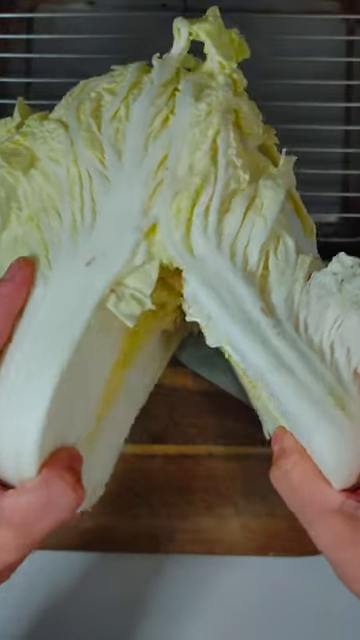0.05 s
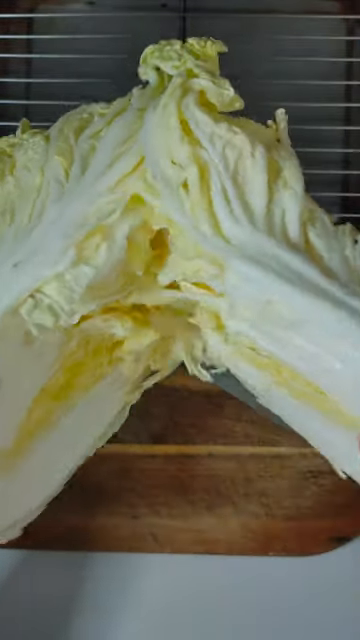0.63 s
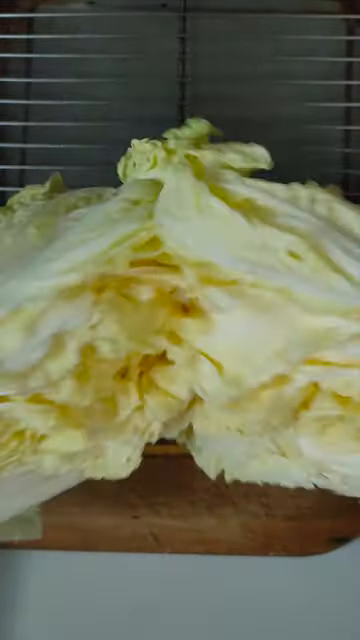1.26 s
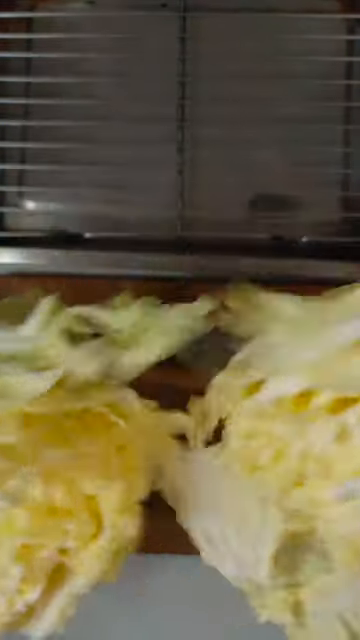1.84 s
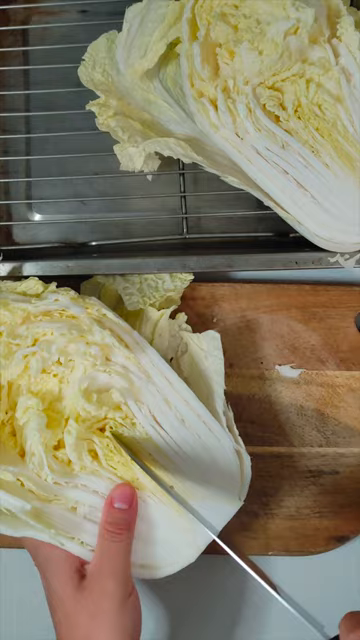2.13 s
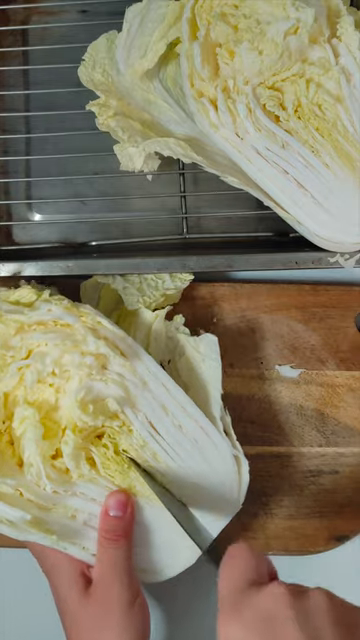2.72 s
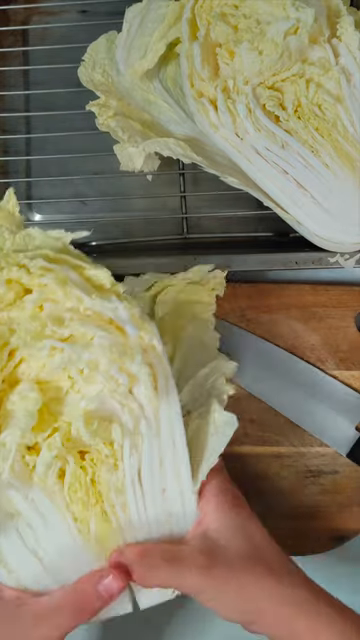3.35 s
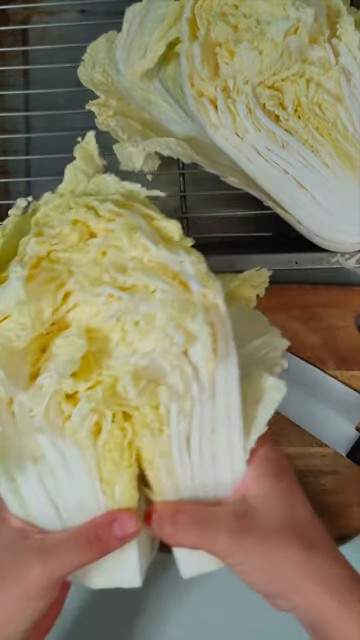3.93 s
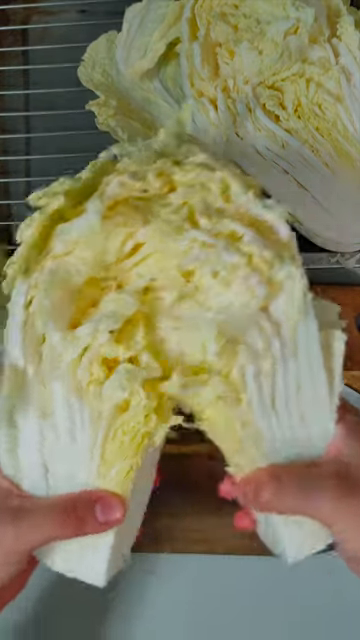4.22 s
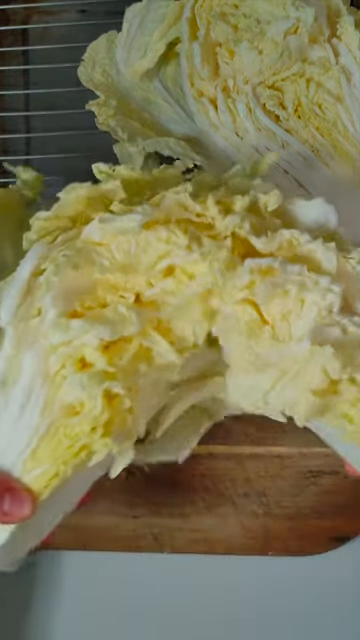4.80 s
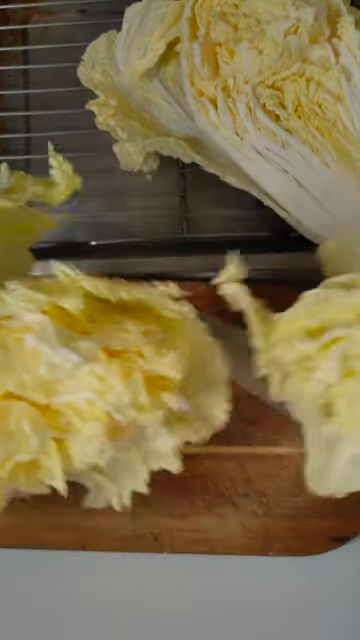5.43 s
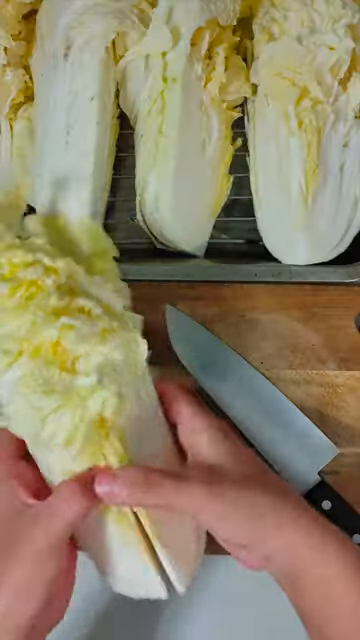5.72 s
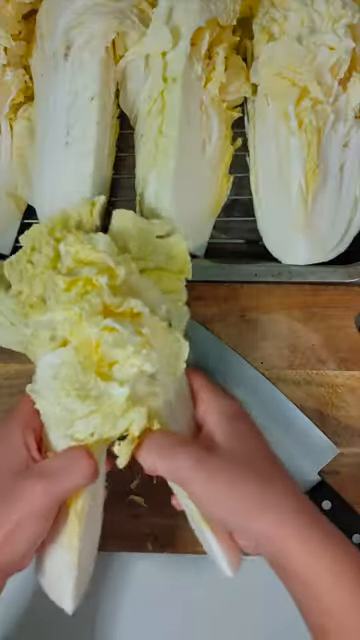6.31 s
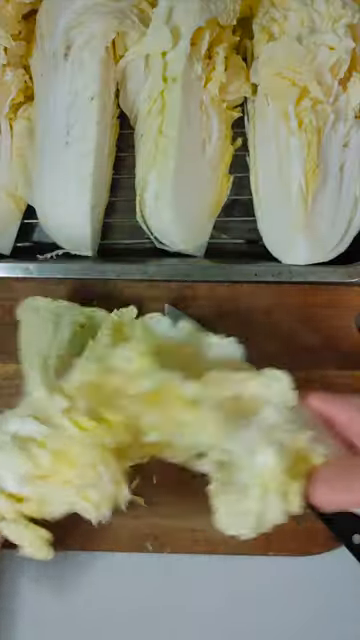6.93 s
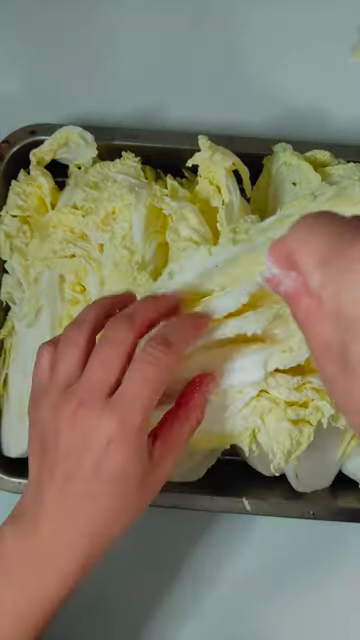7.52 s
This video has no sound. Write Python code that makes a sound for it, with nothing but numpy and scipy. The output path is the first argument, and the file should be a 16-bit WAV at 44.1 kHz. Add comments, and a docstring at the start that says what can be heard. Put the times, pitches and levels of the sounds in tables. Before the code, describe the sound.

Close, crunchy tearing of cabbage three times, with squeaky knife cuts and dull board thuds after the first, over a faint appliance hum.

```python
"""Small kitchen, a phone's two microphones close to a wooden board; an appliance hums throughout.
Hands rip a head of napa cabbage apart: turgid cells burst in dense runs, thick stalks pop hollowly
and whole ribs snap. From 2 s a knife crunches into a stem in three pushes, squeaks and thuds on the
board. Thumbs prise the cut stem open, a second head is ripped at 4 s and a third at 6 s.
Last, leaves are laid softly in a tray."""
import sys
import numpy as np
from scipy import signal
from scipy.fft import rfft, irfft, next_fast_len
from scipy.io import wavfile
from scipy.ndimage import uniform_filter1d, map_coordinates

SR = 44100
rng = np.random.default_rng(int(sys.argv[2]) if len(sys.argv) > 2 else 0)


def unload_wav(signal):
    """Save mono or channel-first audio to the path in sys.argv[1] as 16-bit WAV at rate SR, clipped to [-1, 1]."""
    wavfile.write(
        sys.argv[1],
        SR,
        np.round(np.clip(np.atleast_2d(signal).T, -1, 1) * 32767).astype(np.int16),
    )


N = 337806

# pitch limits of the four tissues (thick rib, thin rib, leaf blade, juice fizz): f/Hz
TISSUE_EDGES = [400, 850, 3300, 7400, 15000]
# single ribs giving way: t/s, level/dB, f/Hz, t60 of the split/s
RIB_SNAPS = [(0.065, -35.5, 1080, .06), (0.291, -32.5, 850, 0.082), (0.478, -27, 830, 0.043),
             (0.636, -41, 910, 0.11), (0.741, -31.5, 1190, 0.098), (0.923, -35.5, 1190, 0.061),
             (1.234, -32, 1100, 0.14), (1.419, -45, 2500, .08), (2.145, -43, 2660, 0.05),
             (2.216, -43, 4220, 0.043), (2.264, -39, 4800, .06), (2.507, -47, 1690, 0.036),
             (2.643, -40, 1290, 0.094), (3.032, -35, 1940, 0.04), (3.084, -35, 910, 0.072),
             (3.278, -26, 2680, 0.12), (4.113, -38.5, 4700, 0.055), (4.152, -37, 1020, 0.03),
             (4.252, -26, 1140, 0.041), (4.297, -27.5, 2050, 0.098), (4.395, -27.5, 1200, 0.049),
             (4.48, -33, 2100, .06), (4.582, -29, 1260, 0.059), (4.711, -31, 1050, 0.04),
             (4.745, -49, 1550, 0.058), (4.831, -30, 1820, 0.057), (4.98, -43, 1690, .05),
             (5.019, -28.5, 3240, .08), (5.073, -30, 4500, .04), (5.094, -29.5, 2800, 0.04),
             (5.121, -35, 1800, 0.051), (5.304, -39.5, 3000, 0.061), (5.353, -33, 4130, .1),
             (5.838, -50, 5370, 0.038), (5.947, -42, 1370, 0.053), (5.998, -42, 1440, 0.061),
             (6.055, -34.5, 1980, 0.11), (6.244, -29.5, 1860, 0.04), (6.364, -32.5, 1300, 0.068),
             (6.488, -36.5, 1850, 0.049), (6.576, -32, 2080, 0.038), (6.603, -35, 2260, .02),
             (6.747, -33, 1850, .03), (6.796, -35, 2200, 0.024)]
# thick, juicy stalks popping open under the hands or the blade: t/s, level/dB, f/Hz
STALK_POPS = [(0.064, -29, 520), (0.071, -28.5, 450), (0.296, -28, 900), (0.366, -25, 820),
              (0.381, -31, 640), (0.421, -31.5, 930), (0.479, -28, 568), (0.518, -28, 820),
              (0.552, -31.5, 980), (0.576, -28.5, 970), (0.637, -32, 890), (0.754, -31, 680),
              (0.844, -27.5, 640), (0.871, -25, 810), (0.972, -32, 545), (1.039, -33, 630),
              (1.118, -24.5, 690), (1.134, -30, 740), (1.198, -27.5, 870), (1.233, -26, 560),
              (1.249, -29, 690), (1.34, -30, 810), (2.366, -33, 1030), (2.397, -34, 1150),
              (2.714, -28.5, 1730), (3.083, -26, 810), (3.089, -27, 3050), (3.245, -25, 980),
              (3.258, -26, 940), (3.278, -24.5, 2650), (3.295, -26, 1030), (4.258, -28, 1070),
              (4.311, -24.5, 990), (4.585, -29.5, 1330), (4.699, -32, 990), (4.803, -31, 1030),
              (5.027, -30.5, 3100), (6.014, -34.5, 1980), (6.083, -32, 3010), (6.335, -34, 2020),
              (6.363, -27.5, 1480), (6.511, -27.5, 1980), (6.641, -27.5, 3050), (6.797, -31, 3050)]
# spectrum of one crack: f/Hz, level/dB
CRACK_COLOUR = [(60, -44), (200, -34), (600, 9.5), (1500, 14), (3000, 4), (6700, 3.5), (7700, -10.5),
                (10000, -1.5), (15500, -40)]


def ripping_hands():
    """Three heads torn apart close to the phone; in the last two, single fibres part as well."""
    # how hard the hands pull on each head: t/s, level/dB
    first_pull = [(0.0, -36.5), (0.08, -43), (0.17, -45), (0.28, -41), (0.3, -33.5), (0.37, -39),
                  (0.9, -37), (0.92, -33.5), (1.06, -41), (1.13, -37.5), (1.15, -43.5), (1.222, -34),
                  (1.238, -34.5), (1.3, -32), (1.36, -34), (1.41, -40), (1.44, -35), (1.51, -39),
                  (1.55, -43.5), (1.8, -34.5), (1.93, -48), (2.03, -45), (2.13, -66.5)]
    second_pull = [(4.03, -69), (4.068, -54), (4.15, -38.5), (4.24, -33), (4.285, -34.5), (4.315, -29.5),
                   (4.47, -38.5), (4.552, -39), (4.598, -34.5), (4.625, -38), (4.7, -34.5), (4.81, -32),
                   (4.936, -45), (4.992, -35.5), (5.01, -41), (5.022, -33), (5.055, -37), (5.13, -35.5),
                   (5.208, -40), (5.272, -49), (5.346, -47.5), (5.358, -42.5), (5.472, -48), (5.58, -91)]
    third_pull = [(5.96, -58), (5.988, -51), (6.002, -40.5), (6.086, -38), (6.116, -42.5), (6.222, -32.5),
                  (6.356, -47), (6.364, -39.5), (6.454, -46.5), (6.506, -38), (6.67, -29.5), (6.862, -42),
                  (6.91, -35), (6.99, -39.5), (7.13, -56.5)]
    # tissues against the pull, one row in the ribs and one in the leaves: level/dB of each tissue
    first_mix = [(-3, -0.5, -4, -14), (-19, -5.5, 1, -3)]
    second_mix = [(-16, -1, -5, -15), (-20, -4, 0.5, -7)]
    third_mix = [(-30, -1.5, -1.1, -21.5), (-12, -5, -1.6, -7.5)]
    # spectra of the bursting cells: f/Hz, level/dB
    head_colour = [(50, -43), (140, -10), (230, -26), (290, -11.5), (380, -10), (550, -7.5), (800, -1.5),
                   (1250, -2.5), (2300, -5.5), (6700, -1), (7700, -8.5), (9500, -8), (15000, -19.5)]
    quarter_colour = [(70, -39), (200, -39), (330, -13.5), (470, -17.5), (620, -10.5), (900, -2),
                      (1200, -2.5), (2500, -5), (6700, -3), (7700, -17), (9500, -20), (15000, -34)]
    heart_colour = [(150, -46), (450, -21), (620, -17.5), (800, -14), (1000, -8.5), (1600, -3), (2800, 1.5),
                    (4200, 0.5), (6700, 0), (7700, -8.5), (9500, -11.5), (15000, -27)]
    first = crunch(tear(first_pull, first_mix, leaves_at_s=1.68, blend_s=0.58), head_colour,
                   cells_per_s=1000, size_db=2, run_db=1.5, runs_per_s=130, level_db=2.5)
    second = crunch(tear(second_pull, second_mix, leaves_at_s=4.97, blend_s=0.18), quarter_colour,
                    cells_per_s=1200, size_db=1.5, run_db=3, runs_per_s=140, level_db=2.5)
    third = crunch(tear(third_pull, third_mix, leaves_at_s=6.42, blend_s=0.47), heart_colour,
                   cells_per_s=1200, size_db=0, run_db=2, runs_per_s=160, level_db=1.5)
    parting = hollow_pops([*fibres(second_pull), *fibres(third_pull)], tick_share=0.1)
    return placed(first + second, left_db=-1.4) + third + parting + prising_thumbs(quarter_colour)


def tear(pull, mix, leaves_at_s, blend_s):
    """A tear runs from ribs into leaves, as loud as the pull. Rows: t/s, level/dB of each tissue."""
    # juicier flesh along the tear: middle t/s, half length/s, extra fizz/dB
    juicy_spots = [(0.008, 0.054, 3.5), (1.274, 0.25, 2.5), (4.24, 0.1, 6), (5.412, 0.068, 7),
                   (6.042, 0.23, 10)]
    surge_db, surge_s, fizz_per_db = 3, 0.0094, 0.13
    times, strength = np.transpose(pull)
    t = np.linspace(times[0], times[-1], 1000)
    db = np.interp(t, times, strength)
    snap_times = np.append(-np.inf, np.array(RIB_SNAPS)[:, 0])
    since_snap = t - snap_times[np.searchsorted(snap_times, t) - 1]
    surge = surge_db * np.exp(-since_snap / surge_s)  # a snap throws its load on the cells around it
    leafy = .5 + .5 * np.tanh((t - leaves_at_s) / blend_s)
    levels = (db + surge)[:, None] + np.outer(1 - leafy, mix[0]) + np.outer(leafy, mix[1])
    juice = sum(extra * np.exp(-((t - s) / half) ** 2) for s, half, extra in juicy_spots)
    levels[:, -1] += fizz_per_db * (db - db.mean()) + juice
    return np.column_stack([t, levels])


def crunch(effort, colour, cells_per_s, size_db, run_db, runs_per_s, level_db, ring_db=9, fold_count=4):
    """Cells burst in quick runs in several folds at once; each fold has its own pitches and place."""
    times, *levels = np.transpose(effort)
    t = np.arange(max(int(times[0] * SR), 0), min(int(times[-1] * SR), N)) / SR
    at = np.flatnonzero(rng.random(len(t)) < cells_per_s / SR)
    fold = rng.integers(fold_count, size=len(at))
    knots = rng.standard_normal((fold_count, int(len(t) * runs_per_s / SR) + 4))
    runs = map_coordinates(knots, [fold, at * runs_per_s / SR])
    bursts = amp(size_db * rng.standard_normal(len(at)) + run_db * runs) * rng.choice([-1, 1], len(at))
    folds = np.zeros((fold_count, len(t)))
    for tissue, db in enumerate(levels):
        train = np.bincount(at, bursts * amp(rng.standard_normal(len(at))), len(t))
        # the effort sets the power, however it is shared among the bursts
        train /= np.sqrt(np.abs(uniform_filter1d(train ** 2, size=1500)) + 1e-9)
        train *= amp(np.interp(t, times, db) + level_db) * straining(t)
        low, high = TISSUE_EDGES[tissue:tissue + 2]
        for k, place in enumerate(rng.permutation(fold_count)):
            pitch = low * (high / low) ** ((place + .5) / fold_count)
            ring = lambda hz: ring_db * np.exp(-(np.log((hz + 1) / pitch) / 0.27) ** 2)
            click = ping(lambda hz: amp(along(colour, hz) + ring(hz)) * tissue_share(hz, tissue))
            fold_train = np.bincount(at, train[at] * (fold == k), len(t))
            folds[k] += signal.oaconvolve(fold_train, click)[:len(t)]
    out = np.zeros((2, N))
    for sound in folds:
        add(out, t[0], kitchen(sound))
    return out


def tissue_share(hz, tissue):
    """The band in which one tissue sounds: thinner walls pop higher."""
    low, high = [1, *TISSUE_EDGES[1:-1], SR][tissue:tissue + 2]
    return 1 / np.sqrt((1 + (low / (hz + 1)) ** 8) * (1 + (hz / high) ** 8))


def straining(t, dip_db=-4.5, dip_s=0.012):
    """Just before a rib or stalk breaks it carries the whole load, and the crackle around it dips."""
    breaks = np.sort([row[0] for row in RIB_SNAPS + STALK_POPS])
    wait = np.append(breaks, np.inf)[np.searchsorted(breaks, t)] - t
    return amp(dip_db * np.exp(-(wait / dip_s) ** 2))


def rib_snaps(ring_share=0.88, ring_cycles=1.4, split_share=2.2, opening_s=0.00087, cells_per_s=1100):
    """A rib cracks, the split runs on through its cells and it rings briefly; thick ribs are duller."""
    out, t = np.zeros((2, N)), np.arange(SR // 10) / SR
    for s, db, hz, t60 in RIB_SNAPS:
        click = ping(lambda f: amp(along(CRACK_COLOUR, f)) / np.hypot(1, f / (6 * hz)) * low_cut(f, hz))
        split = rng.choice([-1, 1], len(t)) * (rng.random(len(t)) < cells_per_s / SR)
        split = split * amp(-60 * t / t60) * (1 - np.exp(-t / opening_s))
        split *= split_share / np.sqrt(cells_per_s / 100)
        split[0] = 1  # the first crack
        ring = np.cos(2 * np.pi * hz * t) * np.exp(-hz * t / ring_cycles)
        body = ring_share * ring / np.linalg.norm(ring)
        add(body, 0, click)
        snap = kitchen(signal.fftconvolve(split, body), near_db=2, near_t60=0.055, room_db=0.5)
        add(out, s, amp(db) * peaked(snap))
    return out


def hollow_pops(rows, tick_share, attack_s=0.00027, sag=0.11, sag_s=0.0028):
    """A stalk or fibre breaks with a tick and its hollow rings, sagging in pitch as the gap opens."""
    out, t = np.zeros((2, N)), np.arange(SR // 20) / SR
    tick = ping(lambda f: amp(along(CRACK_COLOUR, f)))
    for s, db, hz in rows:
        phase = 2 * np.pi * np.cumsum(hz * (1 + sag * np.exp(-t / sag_s))) / SR
        decay_s = 0.0034 * np.sqrt(800 / hz)
        ring = np.sin(phase) * (1 - np.exp(-t / attack_s)) * np.exp(-t / decay_s)
        ring = signal.sosfilt(signal.butter(2, hz / 2, 'high', fs=SR, output='sos'), ring)
        body = ring / np.linalg.norm(ring)
        add(body, 0, tick_share * tick)
        pop = kitchen(body, near_db=-8, near_t60=0.086, room_db=-9, lag_s=0.00043)
        add(out, s, amp(db) * peaked(pop))
    return out


def fibres(pull, per_s=34, level_db=-2.5, middle_hz=1850):
    """Fibres part at random moments, louder under a harder pull. Rows: t/s, level/dB, f/Hz."""
    times, strength = np.transpose(pull)
    span = times[-1] - times[0]
    when, size, pitch = rng.random((int(span * per_s), 3)).T
    s = times[0] + span * when
    db = np.interp(s, times, strength) + level_db + 10 * (size - .5)
    return np.column_stack([s, db, middle_hz * 2 ** (2 * pitch - 1)])


def knife():
    """The blade is pushed through a stem and bursts its cells in a dense crunch."""
    # strokes of the blade: t/s, rise/s, hold/s, level/dB, brightness/dB per tissue step
    pushes = [(2.146, 0.0075, 0.088, -56.5, 8.5), (2.255, 0.051, 0.032, -36.5, 8.5),
              (2.33, 0.017, 0.039, -34.5, 2.5), (2.46, 0.016, 0.11, -53.5, 4),
              (2.652, 0.052, 0.013, -32.5, 1.5), (2.78, 0.018, 0.098, -63.5, -6),
              (3.036, 0.019, 0.042, -29.5, -3.5), (3.11, 0.027, 0.13, -38.5, 1),
              (3.17, 0.1, 0.0087, -25, -5), (3.245, 0.022, 0.049, -34.5, 6)]
    # tissues against the stroke: level/dB of each
    mix = (-11.5, -1, -7.5, -19)
    # spectrum of the stem's cells: f/Hz, level/dB
    stem_colour = [(250, -9.5), (430, -11), (560, -8.5), (700, 1), (1000, 2.5), (1300, 0), (1800, 1),
                   (2800, -4), (4500, -2), (6700, -5.5), (7700, -19.5), (15000, -32.5)]
    return crunch(pressing(pushes, mix), stem_colour,
                  cells_per_s=3200, size_db=2.5, run_db=0.5, runs_per_s=190, level_db=2.5)


def prising_thumbs(colour):
    """Thumbs prise a cut stem open in short, uneven crackles."""
    # strokes of the thumbs: t/s, rise/s, hold/s, level/dB, brightness/dB per tissue step
    prises = [(3.584, 0.0082, 0.04, -48, 0.5), (3.66, 0.032, 0.062, -44.5, -0.5),
              (3.912, 0.0079, 0.013, -61, 5), (5.674, 0.008, 0.0099, -54, 5.5),
              (5.83, 0.0059, 0.013, -69, 13)]
    # tissues against the stroke: level/dB of each
    mix = (-16.5, 1, -3, -13)
    return crunch(pressing(prises, mix), colour,
                  cells_per_s=1400, size_db=3.5, run_db=2.5, runs_per_s=120, level_db=3)


def pressing(strokes, mix, swell_db=11.5, release_db_per_s=241):
    """Each stroke bites, swells to full force, holds and lets go. Rows: t/s, level/dB of each tissue."""
    t = np.arange(strokes[0][0], strokes[-1][0] + .4, .002)
    power = np.full((len(t), len(mix)), 1e-12)
    for s, rise, hold, db, brightness in strokes:
        force = db - swell_db * np.maximum(1 - (t - s) / rise, 0)
        force -= release_db_per_s * np.maximum(t - s - rise - hold, 0)
        colour = np.array(mix) + brightness * (np.arange(len(mix)) - 1)
        power += np.outer(amp(force) * (t >= s), amp(colour)) ** 2
    return np.column_stack([t, 10 * np.log10(power)])


def board_thuds(low_cut_hz=60):
    """The knife's weight rings the board on its counter; a soft contact reaches only the lowest modes."""
    # landings: t/s, level/dB, contact/s
    thuds = [(2.315, -44, 0.007), (2.743, -21, 0.021), (2.801, -32.5, 0.014), (3.039, -29.5, 0.0067),
             (3.08, -26.5, 0.0026), (3.112, -35, 0.0032), (3.154, -29.5, 0.0026), (3.251, -36, 0.0022),
             (3.291, -35, 0.004)]
    # low modes of the board: f/Hz, level/dB, t60/s
    modes = [(56.8, -7, 0.29), (92.5, -6, 0.27), (126, 8, 0.18), (183, -1, 0.23), (217, -8, 0.16),
             (296, -11.5, 0.16)]
    out, t = np.zeros(N), np.arange(SR // 2) / SR
    for s, db, contact in thuds:
        ring = np.zeros(len(t))
        for hz, level, t60 in modes:
            tone = np.sin(2 * np.pi * hz * (1 + 0.013 * rng.standard_normal()) * t)
            ring += amp(level - 60 * t / t60) / (1 + (hz * contact) ** 2) * tone
        add(out, s, amp(db) * ring * (1 - np.exp(-t / contact)) ** 2)
    return signal.sosfilt(signal.butter(2, low_cut_hz, 'high', fs=SR, output='sos'), out)


def blade_knocks(attack_s=0.0017):
    """The blade jolts through the stem and knocks the wood beneath it."""
    # jolts: t/s, level/dB
    knocks = [(2.686, -42), (2.724, -38), (3.268, -43)]
    # higher modes of the board: f/Hz, level/dB, t60/s
    modes = [(579, 2, 0.13), (1030, -7, 0.06), (1390, -4, .06), (1870, -11, .05)]
    out, t = np.zeros((2, N)), np.arange(SR // 4) / SR
    for s, db in knocks:
        ring = sum(amp(level + rng.normal(0, 1.7) - 60 * t / t60) * np.sin(2 * np.pi * hz * t)
                   for hz, level, t60 in modes)
        ring *= 1 - np.exp(-t / attack_s)
        add(out, s, amp(db) * peaked(kitchen(ring, near_db=-12, room_db=-6.5, lag_s=0.0003)))
    return out


def leaf_squeaks(slips_per_s=1600, sag_per_s=1.2):
    """Wet leaves stick and slip on each other or on the blade: a rough creak that sags and fades."""
    # creaks: t/s, level/dB, f/Hz, length/s, half width as a share of f
    squeaks = [(2.297, -37, 1300, 0.11, .25), (2.364, -34.5, 1230, 0.054, .25),
               (2.508, -42, 1750, 0.009, .15), (2.575, -48, 1700, 0.012, .15),
               (2.648, -40, 1200, .035, .25), (2.702, -33, 1700, 0.03, .15), (5.682, -46, 3150, 0.034, .09)]
    out, t = np.zeros((2, N)), np.arange(SR // 5) / SR
    for s, db, hz, length, width in squeaks:
        slips = np.exp(2j * np.pi * rng.random(len(t))) * (rng.random(len(t)) < slips_per_s / SR)
        flutter = signal.fftconvolve(slips, t * np.exp(-2 * np.pi * width * hz * t))[:len(t)]
        tone = np.exp(2j * np.pi * np.cumsum(hz * (1 - sag_per_s * t)) / SR)
        creak = unit(np.real(flutter * tone))
        shape = (1 - np.exp(-t / 0.0015)) * np.exp(-(t / length) ** 2)
        add(out, s, kitchen(amp(db) * shape * creak, near_db=-2.5))
    return out


def head_bumps(width=0.42, attack_s=0.002, t60=0.12):
    """The hollow head knocks on the board as it gives way and booms briefly around one low pitch."""
    # dull knocks: t/s, level/dB, f/Hz
    bumps = [(0.063, -33.5, 400), (0.3, -44.5, 327), (0.952, -44, 326), (1.228, -38.5, 312),
             (1.801, -42, 280), (1.828, -39.5, 400), (2.318, -41, 170), (3.085, -32.5, 230),
             (3.285, -33, 180), (4.793, -45, 334), (5.04, -47, 366), (5.161, -47, 350)]
    out, t = np.zeros((2, N)), np.arange(SR // 5) / SR
    shape = (1 - np.exp(-t / attack_s)) * amp(-60 * t / t60)
    for s, db, hz in bumps:
        hollow = ping(lambda f: low_cut(f, hz) / (1 + ((f / hz - 1) / width) ** 2) ** 2, size=4096)
        boom = unit(signal.fftconvolve(rng.standard_normal(2 * len(t)), hollow)[len(t):2 * len(t)])
        add(out, s, kitchen(amp(db) * boom * shape, near_db=-7.5, room_db=-12.5, lag_s=0.00018))
    return out


def laying_leaves():
    """Leaf tips rustle faintly as they are laid in the tray and patted down."""
    # pats: t/s, rise/s, hold/s, level/dB, brightness/dB per tissue step
    pats = [(7.1, 0.01, 0.038, -66.5, 1), (7.17, 0.024, 0.057, -67.5, -1.5),
            (7.42, 0.07, 0.091, -70.5, -0.5), (7.555, 0.018, 0.043, -63.5, 1)]
    # tissues against the stroke: level/dB of each
    mix = (-6.5, -2, 8.5, 7)
    # spectrum of the leaf tips: f/Hz, level/dB
    tip_colour = [(150, -19), (900, -13), (1400, -7), (2700, -6.5), (4600, -5), (5600, 6.5), (6700, 5),
                  (7700, -18.5), (15000, -28)]
    return crunch(pressing(pats, mix), tip_colour,
                  cells_per_s=1300, size_db=4, run_db=-3, runs_per_s=61, level_db=7)


def worktop(x, half_width=0.018):
    """Tray and worktop ring on briefly in narrow resonances."""
    # resonances: f/Hz, level/dB
    peaks = [(526, 3.5), (566, 11), (607, 2), (713, 4.5), (771, 1), (844, 6), (929, 7.5), (1055, 6),
             (1255, 4.5), (1529, 4), (2069, -1), (2762, 3.5), (3031, 3)]
    gain = lambda hz: amp(sum(db / (1 + ((hz / centre - 1) / half_width) ** 2) for centre, db in peaks))
    return signal.fftconvolve(x, ping(gain, size=8192)[None], axes=1)[:, :N]


def kitchen(x, near_db=-1, near_t60=0.079, room_db=-4, lag_s=0.00049):
    """A close spot: the right microphone hears it first; board, tray and counter answer, then walls."""
    # reverberation of the room: f/Hz, t60/s
    decay = [(150, 0.19), (1000, 0.087), (5000, 0.16), (14000, 0.15)]
    t = np.arange(SR // 3) / SR
    hz, _, spectra = signal.stft(rng.standard_normal((2, len(t))), SR, nperseg=256)
    frames = np.linspace(0, t[-1], spectra.shape[-1])
    spectra *= amp(-60 * frames / along(decay, hz)[:, None])
    tail = signal.istft(spectra, SR, nperseg=256)[1][:, :len(t)] * (1 - np.exp(-t / 0.0032))
    near = rng.standard_normal((2, len(t))) * (rng.random((2, len(t))) < 5000 / SR)
    near *= amp(-60 * t / near_t60) * (t > .0006)
    answer = sum(amp(db) * part / np.linalg.norm(part, axis=1, keepdims=True)
                 for db, part in [(near_db, near), (room_db, tail)])
    answer[0, round(lag_s * rng.uniform(.82, 1.18) * SR)] += 1  # direct sound, later on the left
    answer[1, 0] += 1
    return signal.fftconvolve(x[None], answer / np.linalg.norm(answer[0]), axes=1)


def appliance(hum_gain, air_db=-63):
    """In the background, a motor's slightly unsteady mains lines over the soft rush of its fan."""
    # lines of the hum: f/Hz, level/dB
    lines = [(59.2, -69.5), (118.4, -62), (169, -73), (280, -69), (420, -72.5), (1050, -75)]
    # spectrum of the fan: f/Hz, level/dB
    air_colour = [(25, -6), (50, -23), (80, -7), (160, 0), (280, -1), (500, 0), (1000, -2.5), (1300, -10),
                  (4500, -13), (6500, -9), (7700, -20.5), (15000, -22.5)]
    t = np.arange(N) / SR
    hum = sum(amp(db + 2.5 * wobble(13)) * np.sqrt(2) * np.sin(2 * np.pi * hz * t + 0.53 * wobble(3))
              for hz, db in lines)
    mid, side = unit(filtered(rng.standard_normal((2, N)), lambda hz: amp(along(air_colour, hz))))
    side = filtered(side, lambda hz: hz / (hz + 200))  # the bass is alike at both microphones
    return hum * hum_gain + amp(air_db) * np.array([mid + side, mid - side])


def suppressor(x, depth_db=-8, threshold_db=-43):
    """The gain that the phone leaves to a steady hum: it sinks while x is loud."""
    power = np.abs(uniform_filter1d(np.mean(x ** 2, axis=0), size=8000))
    return amp(depth_db * power / (power + amp(threshold_db) ** 2))


def amp(db):
    """Decibels to gain."""
    return 10 ** (np.asarray(db) / 20)


def unit(x):
    """Scaled to rms 1."""
    return x / np.sqrt(np.mean(x ** 2) + 1e-20)


def peaked(x):
    """Scaled so that its loudest 4 ms have rms 1."""
    return x / np.sqrt(uniform_filter1d(np.mean(x ** 2, axis=0), size=180).max())


def placed(x, left_db):
    """Louder at the left microphone by left_db."""
    return x * amp([[left_db / 2], [-left_db / 2]])


def along(points, hz):
    """Rows of f/Hz, value, read on a log frequency axis."""
    f, v = np.transpose(points)
    return np.interp(np.log(hz + 1), np.log(f + 1), v)


def low_cut(f, pitch):
    """A gain that falls away below half the pitch."""
    return f ** 2 / (f ** 2 + (.5 * pitch) ** 2)


def wobble(rate):
    """A smooth random curve, rate knots a second."""
    return map_coordinates(rng.standard_normal(int(N * rate / SR) + 4), [np.arange(N) * rate / SR])


def filtered(x, response):
    """x through a response of frequency."""
    size = next_fast_len(N + SR // 2)
    return irfft(rfft(x, size) * response(np.fft.rfftfreq(size, 1 / SR)), size)[..., :N]


def ping(gain, size=1024):
    """The causal click of energy 1 whose spectrum has the shape gain(f)."""
    cepstrum = irfft(np.log(np.maximum(gain(np.fft.rfftfreq(size, 1 / SR)), 1e-6)))
    cepstrum[1:size // 2] *= 2
    cepstrum[size // 2 + 1:] = 0
    click = irfft(np.exp(rfft(cepstrum)))
    return click / np.linalg.norm(click)


def add(track, s, sound):
    """Mix a sound into a track at time s."""
    start = max(round(s * SR), 0)
    track[..., start:start + sound.shape[-1]] += sound[..., :N - start]


def scene():
    """Cabbage and board up close, the appliance behind; each microphone has its own colour."""
    # balance of the two microphones: f/Hz, left minus right/dB
    balance = [(55, 3.5), (180, 10), (260, 0), (350, -13), (550, 7), (780, -4), (950, 8.5), (1200, -0.5),
               (1450, 1), (1800, -4.5), (3100, -3), (4200, 1.5), (10000, 2), (15000, -9)]
    crackle = ripping_hands() + placed(knife(), left_db=1) + placed(laying_leaves(), left_db=0.5)
    breaks = rib_snaps() + hollow_pops(STALK_POPS, tick_share=0.4)
    cabbage = worktop(crackle + breaks + blade_knocks() + leaf_squeaks() + head_bumps())
    mix = cabbage + board_thuds() + appliance(suppressor(cabbage))
    return filtered(mix, lambda hz: amp(np.outer([.5, -.5], along(balance, hz))))


def record(dry):
    """The phone keeps nothing above its band limit."""
    return filtered(dry, lambda hz: hz < 15750)


dry = scene()
out = record(dry)
unload_wav(out)
```